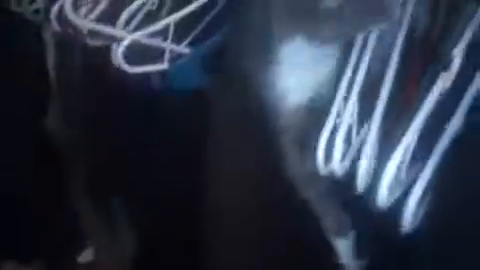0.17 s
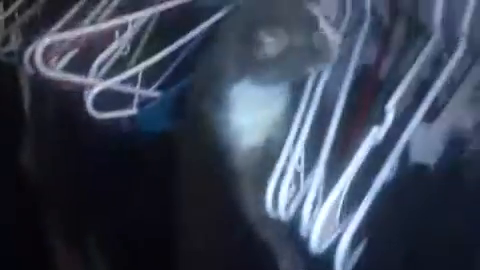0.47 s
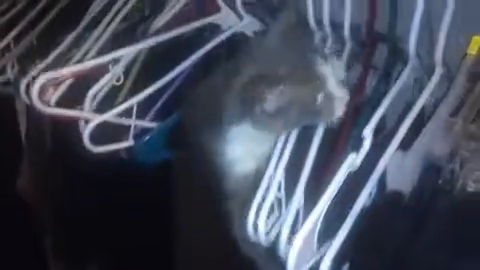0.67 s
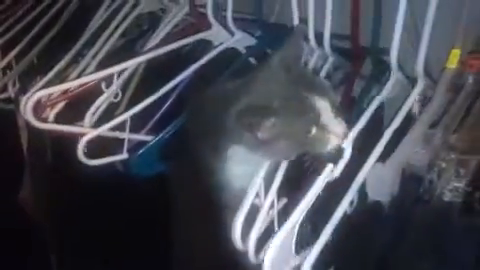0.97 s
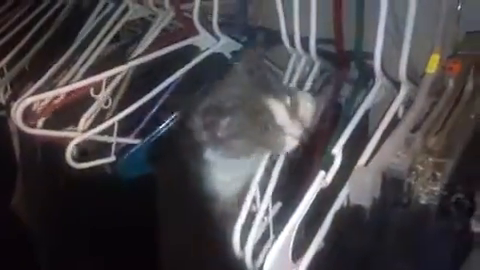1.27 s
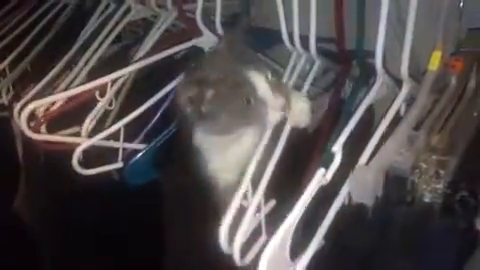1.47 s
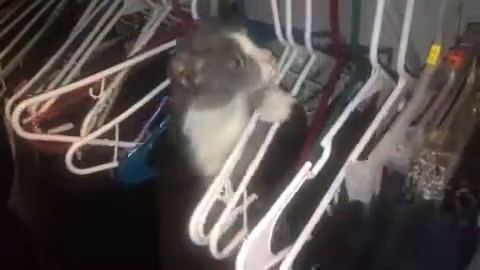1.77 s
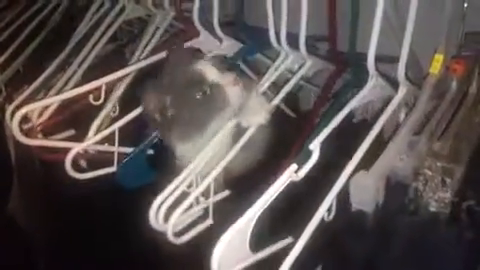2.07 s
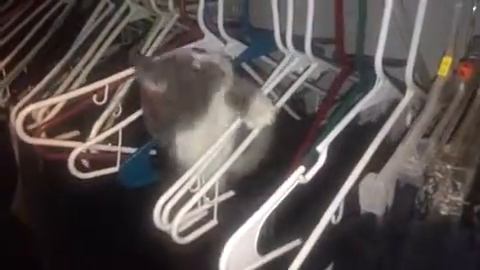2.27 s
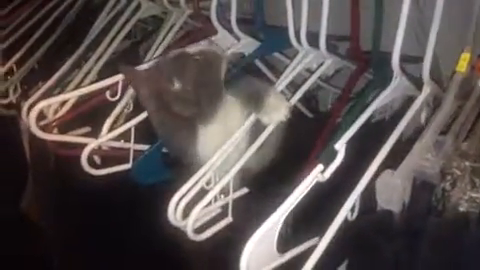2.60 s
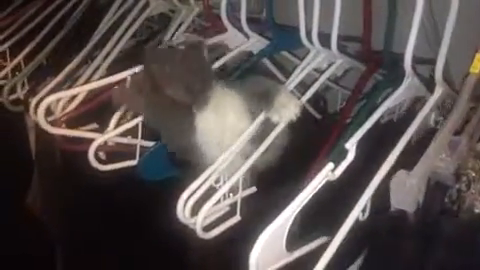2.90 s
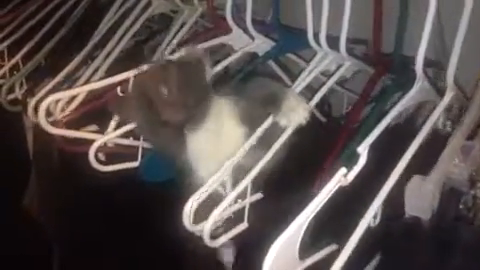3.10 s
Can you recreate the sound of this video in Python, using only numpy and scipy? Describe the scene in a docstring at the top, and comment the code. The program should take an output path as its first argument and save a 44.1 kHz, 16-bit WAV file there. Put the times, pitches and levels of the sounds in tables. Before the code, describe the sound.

Plastic hangers click and clack under a cat in a quiet closet. Silence until 0.2 s, then low house rumble, hiss, faint hum and a fine mains buzz switch on. Camera thumps, finger rubbing and dull rail knocks crowd 0.2-0.5 s. Faint ticks follow, a small knock at 1.1, a bump at 1.3, a soft clack at 1.45, light taps near 1.9, one bright clack at 2.2, then only room tone until the end.

```python
"""A short silence gives way to a quiet closet heard by a handheld camera: house rumble and microphone hiss
(shaped noise), faint hum and whine (sinusoids) and a mains-rate ticking buzz (repeated decaying modes).
Fingers rub the camera (band-passed noise), it is bumped (single pressure swings), and the rail knocks dully
(damped low modes). Plastic hangers tick and clack once as a cat climbs on them (modes driven by chatter)."""
import sys
import numpy as np
from scipy import signal
from scipy.fft import rfft, irfft
from scipy.io import wavfile
from scipy.ndimage import uniform_filter1d

SR = 44100
rng = np.random.default_rng(int(sys.argv[2]) if len(sys.argv) > 2 else 0)


def file_out(sig):
    """Save sig as 16-bit WAV at sys.argv[1]."""
    # one column per channel
    cols = np.atleast_2d(sig).T
    # limit, then scale
    lim = np.clip(cols, -1, 1)
    pcm = np.round(lim * 32767).astype(np.int16)
    wavfile.write(sys.argv[1], SR, pcm)


def volts_from_db(level):
    """Convert decibel levels to linear amplitude ratios."""
    exponent = np.asarray(level, float) / 20
    return 10 ** exponent


N = 143325


def ring(length_s, hz, t60_s, phase=0.):
    """Damped oscillation: a mode loses 60 dB, a factor of 1000, in t60_s."""
    t = np.arange(int(length_s * SR)) / SR
    return np.sin(2 * np.pi * hz * t + phase) * np.exp(-np.log(1000) * t / max(t60_s, 1e-3))


def add(out, at_s, x):
    """Superposition: a short sound is summed in at its time."""
    i = int(round(at_s * SR))
    out[i:i + len(x)] += x[:len(out) - i]


def walk(rate_hz):
    """Slow random modulation: levels held 1 / rate_hz seconds and smoothed twice, with zero mean and spread 1."""
    hold = int(SR / rate_hz)
    steps = np.repeat(rng.standard_normal(N // hold + 1), hold)
    smooth = uniform_filter1d(uniform_filter1d(steps, hold), hold)[:N]
    return (smooth - smooth.mean()) / smooth.std()


def curve(points):
    """Amplitude envelope: gain over time, interpolated in decibels between (time_s, level_db) points."""
    return volts_from_db(np.interp(np.arange(N) / SR, *np.array(points).T))


# relative spectral density of room rumble and microphone hiss: frequency_hz, density_db (per Hz)
ROOM_SPECTRUM = [(12, -45), (20, -17.5), (60, -8), (95, -1), (125, 0), (166, -12.5), (205, -12), (235, -15),
                 (300, -17.5), (337, -24), (365, -22.5), (420, -28.5), (664, -31), (900, -35),
                 (2100, -39.5), (3450, -37.5), (6000, -42.5), (10300, -52.5), (11000, -49), (22000, -72)]
# swelling of the house rumble, in full only in the bass: time_s, level_db
RUMBLE_SWELL = [(.5, -1.5), (.9, -3), (1.25, -1), (1.9, 2.5), (2.4, -2.5), (3., -0.5), (3.25, -3.5)]
ROOM_DB, SWELL_DB, FLICKER_DB = -50, 2.5, -0.5  # overall rms; spreads of the bass modulation


def room():
    """Spectral shaping: coloured noise in overlapping octaves, modulated fully in the bass and less in the hiss."""
    hz = np.fft.rfftfreq(N, 1 / SR) + 1
    table_hz, table_db = np.array(ROOM_SPECTRUM).T
    density = volts_from_db(np.interp(np.log(hz), np.log(table_hz), table_db))
    spectrum = rfft(rng.standard_normal(N)) * density
    swell = walk(1.818)
    out = np.zeros(N)
    for centre_hz in 20 * 2. ** np.arange(10):
        # raised-cosine octave bands that crossfade into each other
        share = np.cos(np.pi / 2 * np.clip(np.log2(hz / centre_hz), -1, 1)) ** 2
        depth = min(1, 250 / centre_hz) ** .5
        waver = volts_from_db(depth * (SWELL_DB * swell + FLICKER_DB * walk(9.1)))
        out += irfft(spectrum * share, N) * waver * curve(RUMBLE_SWELL) ** depth
    return out * volts_from_db(ROOM_DB) / out.std()


# hum lines: pitch_hz, level_db (rms before waver), waver_db (spread)
HUM_LINES = [(118.4, -60, 3.5), (258.4, -63, 2.5), (371.4, -75, 3)]
HUM_PHASE_WAVER_RAD = .7


def hum():
    """Amplitude and phase modulation: sinusoids whose level and phase waver slowly."""
    t = np.arange(N) / SR
    out = np.zeros(N)
    for hz, db, waver_db in HUM_LINES:
        level = 2 ** .5 * volts_from_db(db + waver_db * walk(11))
        out += level * np.sin(2 * np.pi * hz * t + HUM_PHASE_WAVER_RAD * walk(4.206))
    return out


# faint electronic whine: pitch_hz, level_db (rms)
WHINE_LINES = [(730, -84.5), (2211.8, -91), (2941.8, -87), (3671.3, -85), (4401, -87), (5154, -90),
               (5884, -90), (6614, -99)]


def whine():
    """Additive synthesis: thin steady sinusoids with random starting phases."""
    t = np.arange(N) / SR
    return sum(2 ** .5 * volts_from_db(db) * np.sin(2 * np.pi * (hz * t + rng.random())) for hz, db in WHINE_LINES)


# modes rung by each buzz tick: pitch_hz, level_db (relative), t60_s
TICK_RESONANCES = [(2050, -13, .004), (2800, -4, .005), (3350, 0, .0055), (4150, -3.5, .004),
                   (5400, -6, .003), (7400, -9, .003)]
TICK_RATE_HZ, TICK_OFFSET_S, TICK_JITTER_S = 59.97, -.0007, .0007
TICK_DB, TICK_SCATTER_DB, TICK_RISE_S = -49.5, 1.2, .0004


def buzz():
    """Periodic excitation: a short modal tick in each mains cycle, a little early or late."""
    out = np.zeros(N)
    rise = 1 - np.exp(-np.arange(int(.012 * SR)) / SR / TICK_RISE_S)
    for k in range(1, int(N / SR * TICK_RATE_HZ)):
        tick = 0
        for hz, db, t60_s in TICK_RESONANCES:
            level = volts_from_db(db + TICK_SCATTER_DB * rng.standard_normal())
            tick = tick + level * ring(.012, hz, t60_s, 2 * rng.standard_normal())
        at_s = TICK_OFFSET_S + k / TICK_RATE_HZ + TICK_JITTER_S * rng.standard_normal()
        level = volts_from_db(TICK_DB + TICK_SCATTER_DB * rng.standard_normal())
        add(out, at_s, level * rise * tick)
    return out


# fingers rubbing the camera as it is raised: time_s, level_db (rms)
RUB_LEVEL = [(.2, -62), (.225, -66), (.25, -60.5), (.268, -62), (.3, -61), (.33, -64), (.4, -65.5),
             (.5, -73.5), (.7, -78.5)]
RUB_LOW_BAND_HZ, RUB_HIGH_BAND_HZ = [361.2, 1122.3], [2368.8, 7360.2]
RUB_HIGH_DB, RUB_GRAIN_DB = -32.5, 3  # gain of the high band; spread of the grain


def rub():
    """Friction noise: grainy skin contact heard as a broad low scrape with a little fizz."""
    grain = rng.standard_normal(N) * volts_from_db(RUB_GRAIN_DB * walk(150))
    scrape = signal.lfilter(*signal.butter(1, RUB_LOW_BAND_HZ, "band", fs=SR), grain)
    fizz = signal.lfilter(*signal.butter(1, RUB_HIGH_BAND_HZ, "band", fs=SR), grain)
    friction = scrape + volts_from_db(RUB_HIGH_DB) * fizz
    return friction / friction.std() * curve(RUB_LEVEL)


# bumps on the camera body: crest_s, level_db (peak), pitch_hz, direction (sign of the crest)
CAMERA_BUMPS = [(0.202, -50, 300, -1), (0.232, -39.5, 197, 1), (0.2433, -30, 94, 1), (0.299, -37.5, 130, 1),
                (0.3651, -24, 89, 1), (0.4185, -31.5, 208, -1), (0.422, -33.5, 98, 1),
                (1.3005, -44, 1100, -1), (1.3007, -35, 270, -1), (1.3035, -36, 75, 1), (1.59, -43, 145, 1),
                (1.929, -42, 110, 1), (2.1874, -41, 520, -1), (2.1888, -37, 260, 1), (2.1895, -35, 95, 1), ]
BUMP_RISE, BUMP_FALL = 0.33, 0.45  # Gaussian widths, in cycles


def bumps():
    """Pressure pulse: a cosine under a lopsided Gaussian swings one way, crests, and swings back."""
    t, out = np.arange(N) / SR, np.zeros(N)
    for crest_s, db, hz, direction in CAMERA_BUMPS:
        cycles = (t - crest_s) * hz
        width = np.where(cycles < 0, BUMP_RISE, BUMP_FALL)
        shape = np.exp(-(cycles / width) ** 2 / 2)
        out += np.sign(direction) * volts_from_db(db) * shape * np.cos(2 * np.pi * cycles)
    return out


# dull knocks through rail and shelf: start_s, level_db (main mode before its soft rise), pitch_hz, t60_s
RAIL_KNOCKS = [(0.2312, -30.5, 470, 0.013), (0.241, -31.5, 440, 0.03), (.248, -50, 1500, .02),
               (.253, -45, 910, 0.022), (.278, -43, 593, 0.046), (.283, -43, 794, 0.016),
               (0.296, -35.5, 712, 0.028), (0.36, -38, 446, 0.023), (.418, -40.5, 313, 0.06),
               (0.477, -53.5, 490, 0.045), (1.1209, -37.5, 759, 0.017), (1.1245, -42, 710, 0.012),
               (1.589, -49.5, 546, 0.028), (1.906, -47.5, 717, 0.04), (1.910, -44, 810, 0.014)]
# neighbouring modes of a knock: pitch_ratio, level_db (both relative to the main mode)
KNOCK_NEIGHBOURS = [(0.619, 8.5), (1.55, -6.5), (2.301, -15.5)]
KNOCK_RISE_S = .0011


def knocks():
    """Modal impact: a soft contact gradually excites a low mode and its faster-damped neighbours."""
    out = np.zeros(N)
    for start_s, db, hz, t60_s in RAIL_KNOCKS:
        body = ring(.1, hz, t60_s)
        for ratio, side_db in KNOCK_NEIGHBOURS:
            body = body + volts_from_db(side_db) * ring(.1, hz * ratio, t60_s * 0.37)
        rise = 1 - np.exp(-np.arange(len(body)) / SR / KNOCK_RISE_S)
        add(out, start_s, volts_from_db(db) * body * rise)
    return out


# modes of a plastic hanger: pitch_hz, level_db (relative), t60_s (ringing freely)
HANGER_MODES = [(1780, -20, .025), (2250, -13, .06), (2800, -11, .04), (3340, -10, .04), (4100, 0, .045),
                (4404, -7, .045), (4700, 0, .035), (4950, 6, .009), (5900, -9, .016), (6589, -11, .07),
                (6901, -11, .13), (7600, -4, .01), (8016, -9, .035), (8730, -13, .04), (10000, -23, .025)]
# hanger on hanger: start_s, level_db (early rms), brightness_db (per octave), chatter_s, # ring_share (fraction
# of the free t60)
HANGER_CLACKS = [(0.256, -72, 3, .001, 0.11), (.345, -69, 4, 0.0013, .15), (.72, -70, 2, .001, .1),
                 (.7535, -66, -3, .001, .15), (.7565, -66, -1, .001, .35), (1.002, -65.5, -7, 0.0012, .15),
                 (1.031, -66.5, 0, 0.0009, .1), (1.4502, -57, -4, 0.0048, 0.091),
                 (1.774, -67.5, -16, 0.0023, 0.18), (1.870, -65, -1, .001, .45),
                 (1.9195, -69, 0, .0003, .15), (1.9245, -63, -2, .0005, .3), (2.195, -43.5, -1, .00005, 1),
                 (2.198, -53, -4, .002, .3), (2.2015, -54, -2, .003, .3), (2.2052, -57, 0, .0003, .4),
                 (2.2145, -63, -3, .003, 0.37), (2.2265, -67, -2, .0003, .3)]
CLACK_SCATTER_DB, CHATTER_DB = 1., -11.5
CLOSET_DB, CLOSET_T60_S = -18, 0.04


def hangers():
    """Source and resonator: chattering contacts drive modes damped by touch; the closet adds a short tail."""
    out = np.zeros(N)
    for start_s, db, tilt_db, chatter_s, share in HANGER_CLACKS:
        body = 0
        for k, (hz, mode_db, t60_s) in enumerate(HANGER_MODES):
            level = volts_from_db(mode_db + tilt_db * np.log2(hz / 4000) + CLACK_SCATTER_DB * rng.standard_normal())
            body = body + level * (-1) ** k * ring(.15, hz, t60_s * share)  # alternating polarity
        chatter_shape = np.exp(-(np.arange(600) / SR / chatter_s) ** 4)
        contact = volts_from_db(CHATTER_DB) * rng.standard_normal(600) * chatter_shape
        hit = signal.fftconvolve(body, np.append(1, contact))  # first touch, then chatter
        early_rms = np.sqrt(np.mean(hit[:300] ** 2))
        add(out, start_s, volts_from_db(db) * hit / early_rms)
    # at 0 Hz and a quarter-cycle phase, ring() is a plain exponential decay
    tail = rng.standard_normal(int(.15 * SR)) * ring(.15, 0, CLOSET_T60_S, np.pi / 2)
    tail /= np.sqrt(np.sum(tail ** 2))
    return out + volts_from_db(CLOSET_DB) * signal.fftconvolve(out, tail)[:N]


def scene():
    """Linear superposition: all sources add at the microphone."""
    steady = room() + hum() + whine() + buzz()
    handling = rub() + bumps() + knocks() + hangers()
    return (steady + handling)[None]


def top_cut(x):
    """Nothing passes above the cut-off."""
    return signal.sosfilt(signal.butter(12, 10480, fs=SR, output="sos"), x)


START_S, FADE_S = .2015, 0.0012  # fully open; length of the fade just before
LEAD_IN_S, LEAD_IN_DB = .045, -22
TOP_HZ = 10520


def record(dry):
    """Gating and low-pass filtering: a faint lead-in grows, the sound switches on, and the top is cut."""
    t = np.arange(N) / SR
    lead = volts_from_db(LEAD_IN_DB) * np.clip((t - START_S) / LEAD_IN_S + 1, 0, 1) ** 3
    opening = np.clip((t - START_S) / FADE_S + 1, 0, 1)
    gate = np.maximum(lead, opening)
    low_pass = signal.ellip(8, .2, 13, TOP_HZ, fs=SR, output="sos")
    mix = signal.sosfilt(low_pass, dry * gate)
    return top_cut(mix)


dry = scene()
out = record(dry)
file_out(out)
```